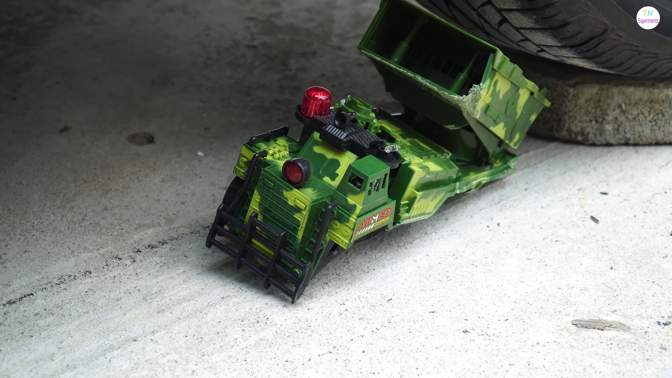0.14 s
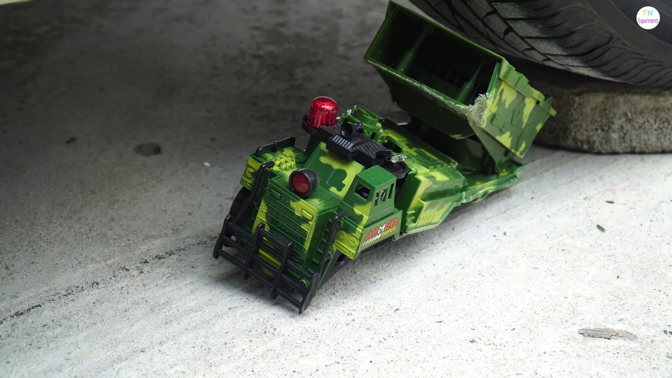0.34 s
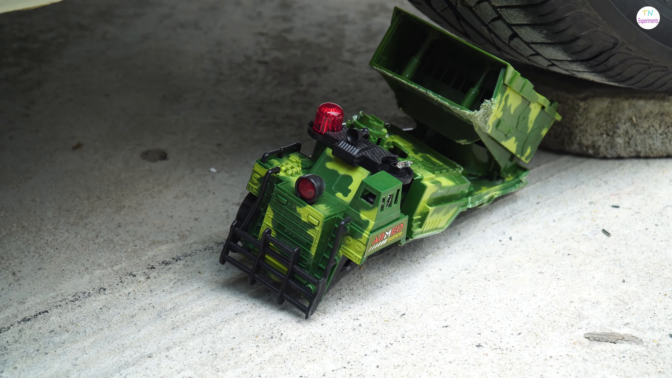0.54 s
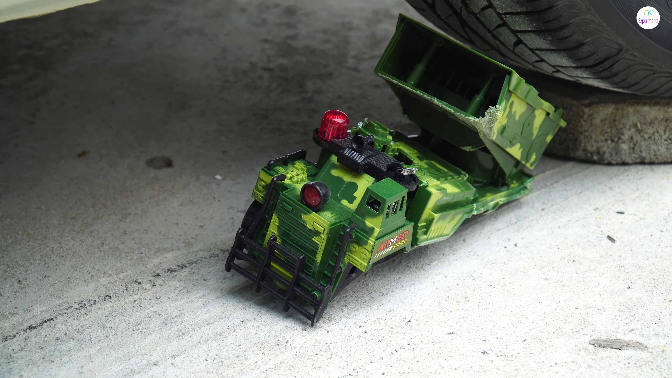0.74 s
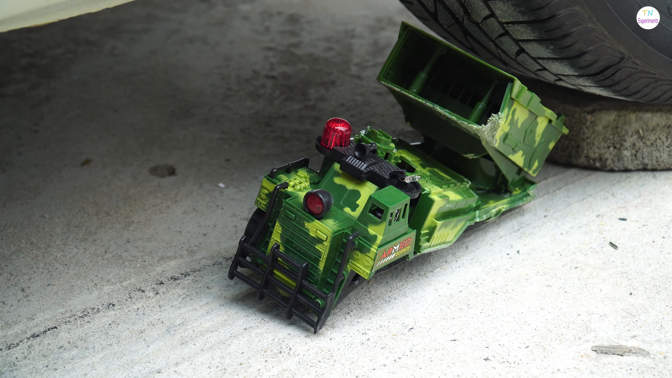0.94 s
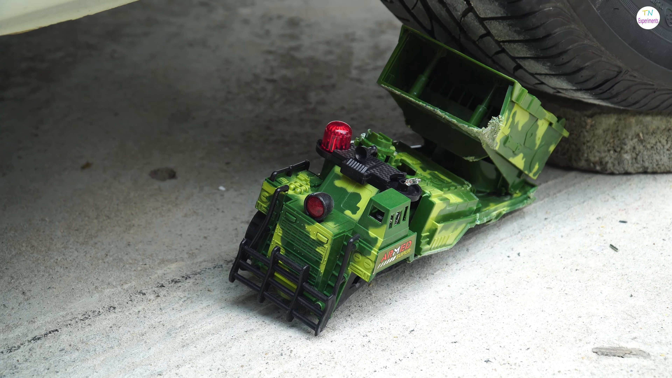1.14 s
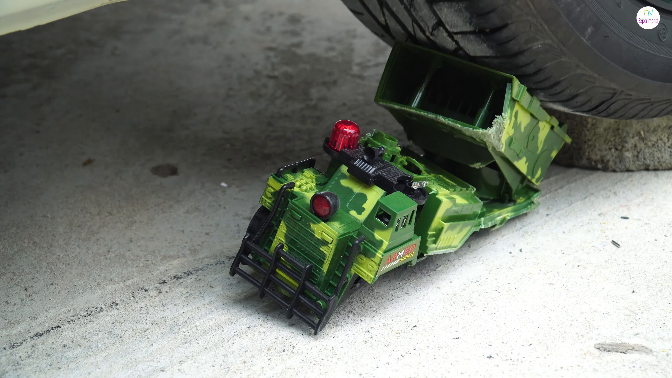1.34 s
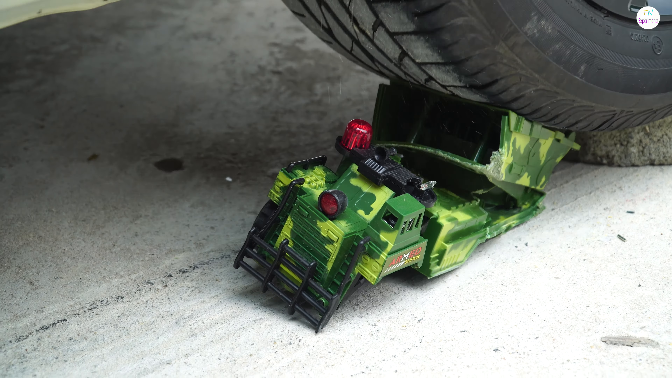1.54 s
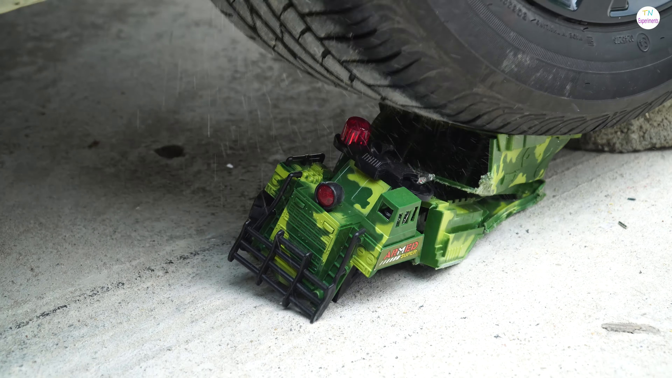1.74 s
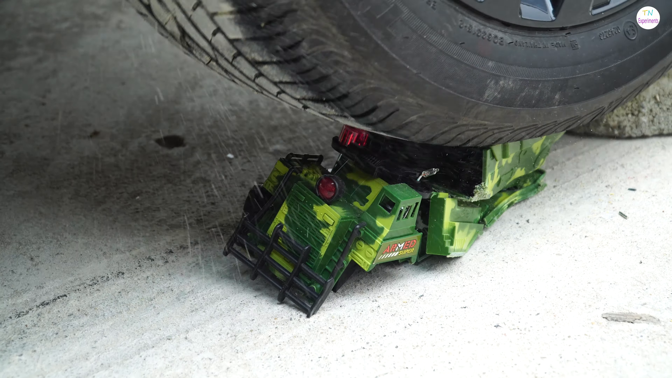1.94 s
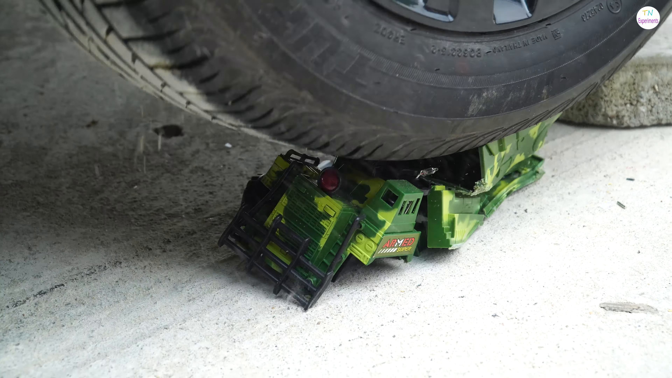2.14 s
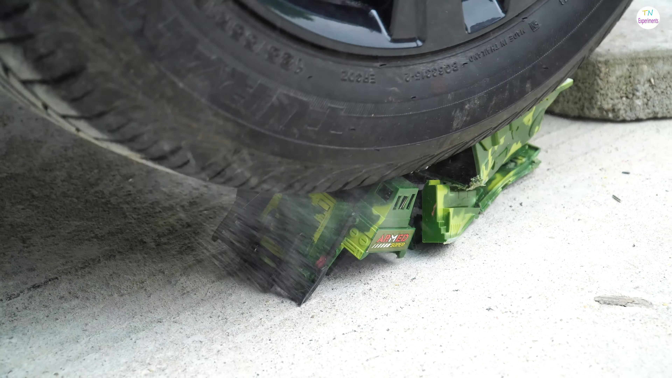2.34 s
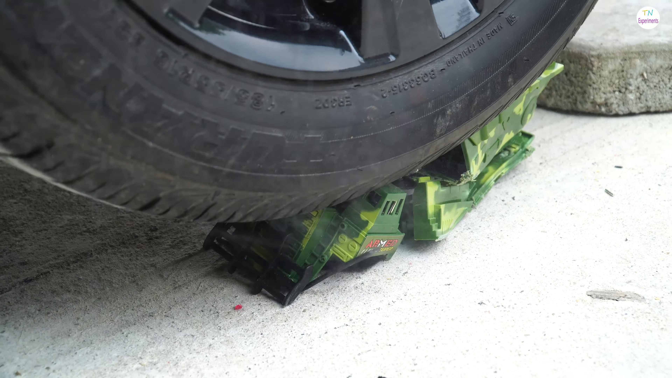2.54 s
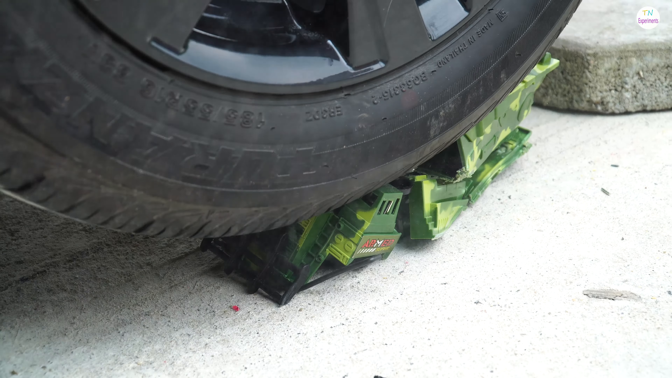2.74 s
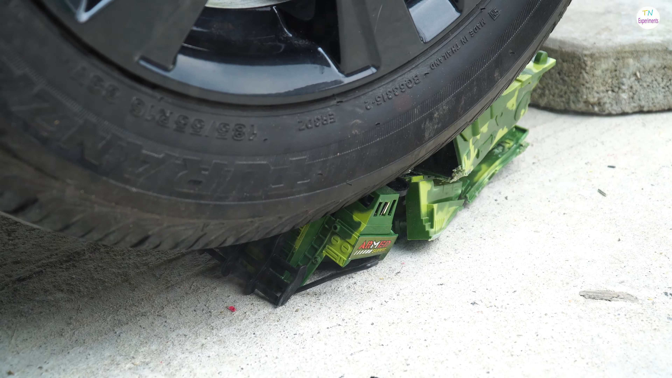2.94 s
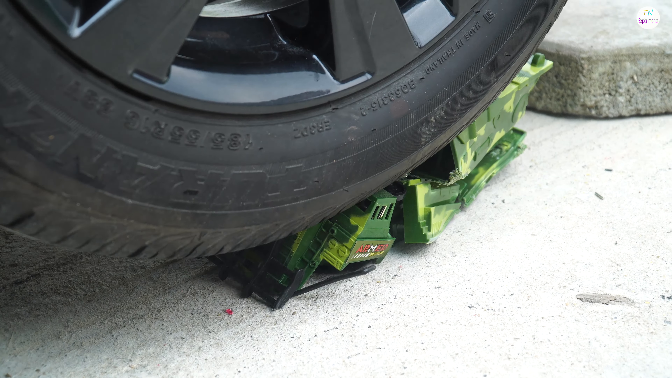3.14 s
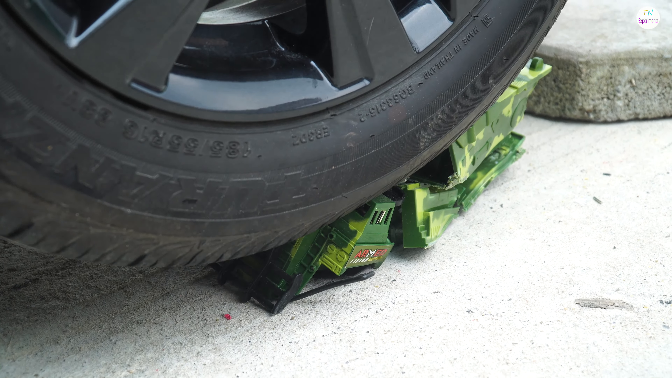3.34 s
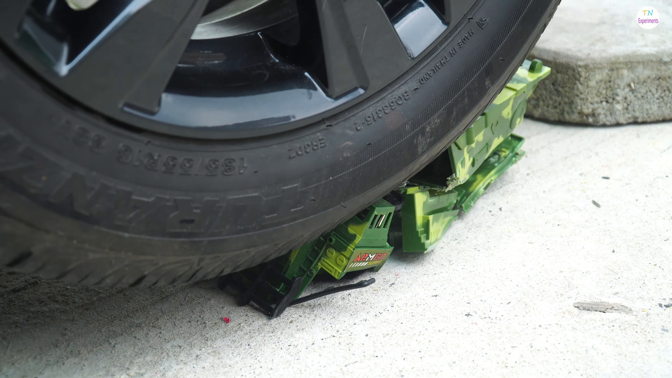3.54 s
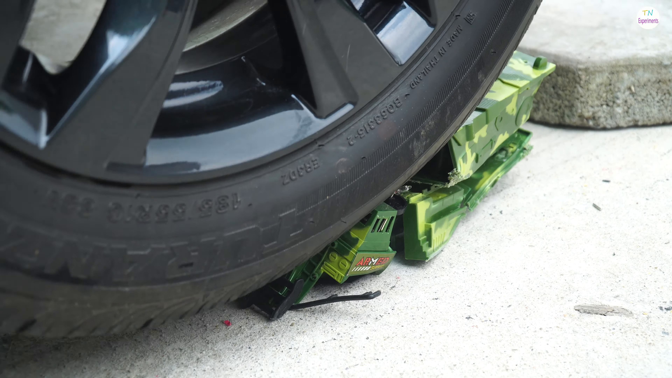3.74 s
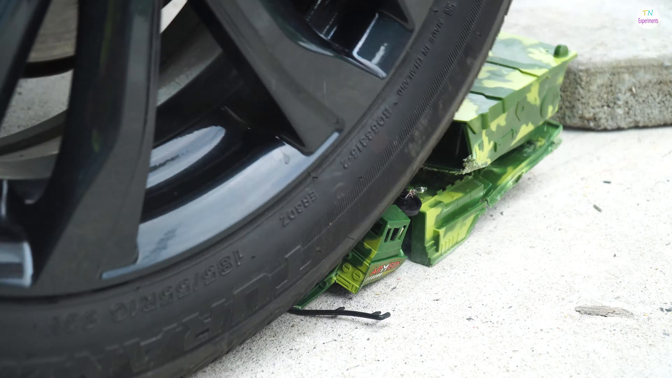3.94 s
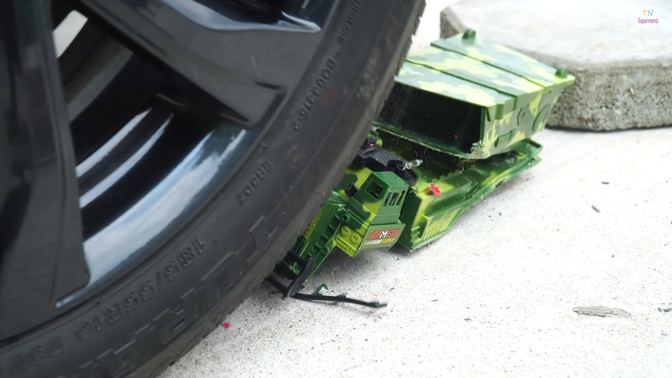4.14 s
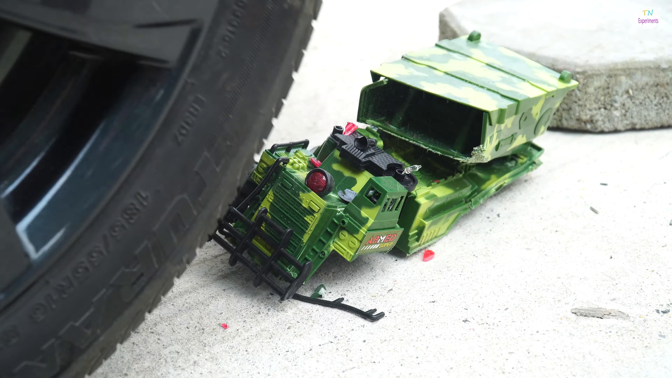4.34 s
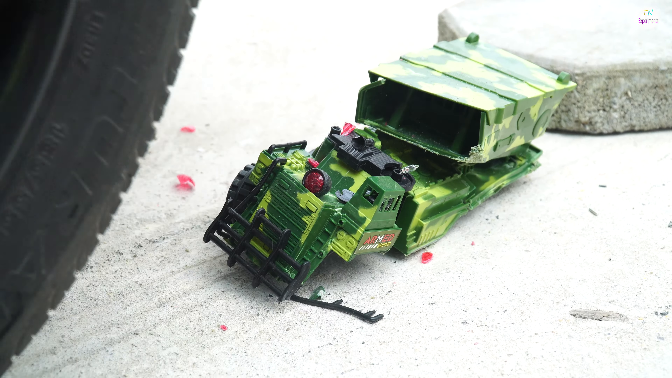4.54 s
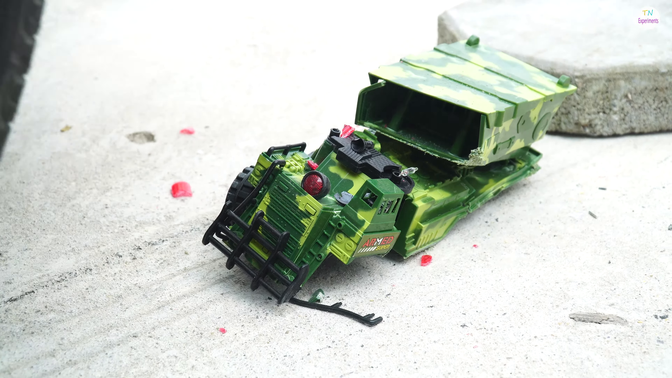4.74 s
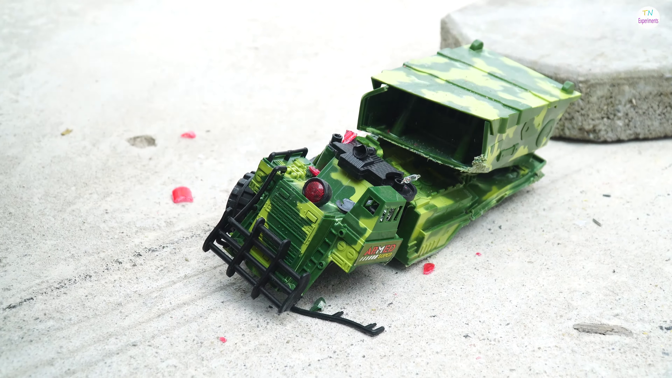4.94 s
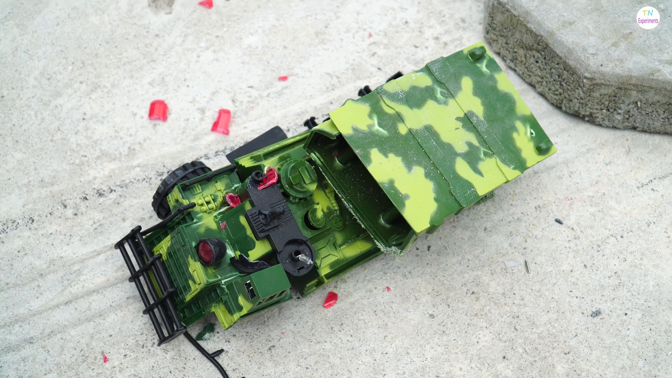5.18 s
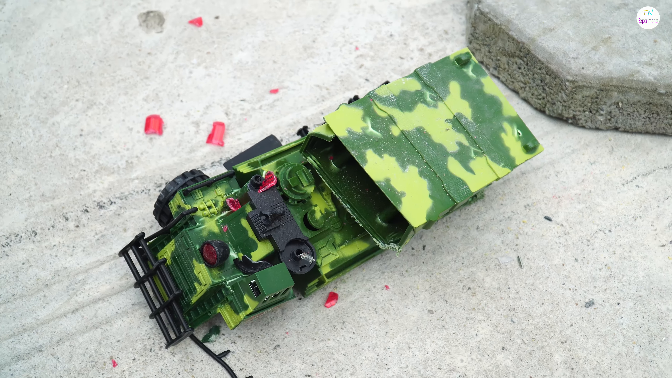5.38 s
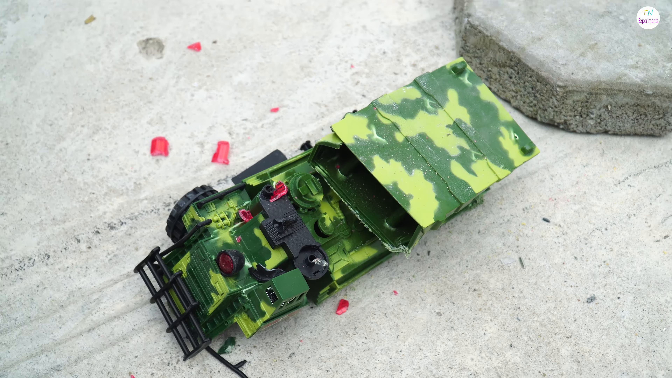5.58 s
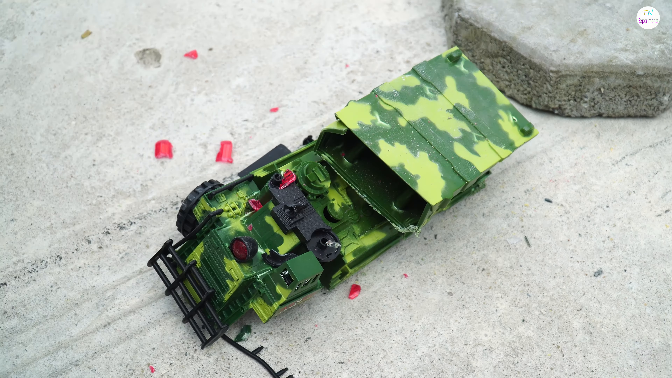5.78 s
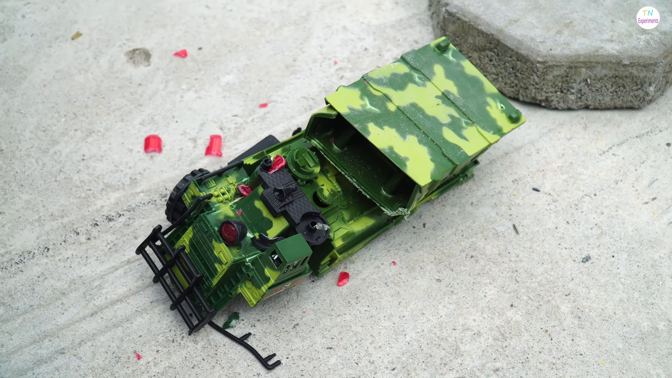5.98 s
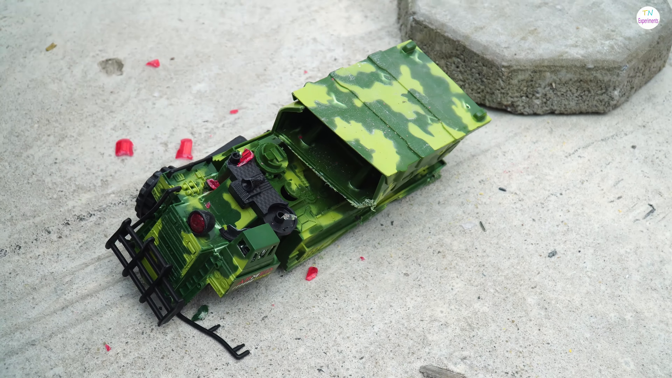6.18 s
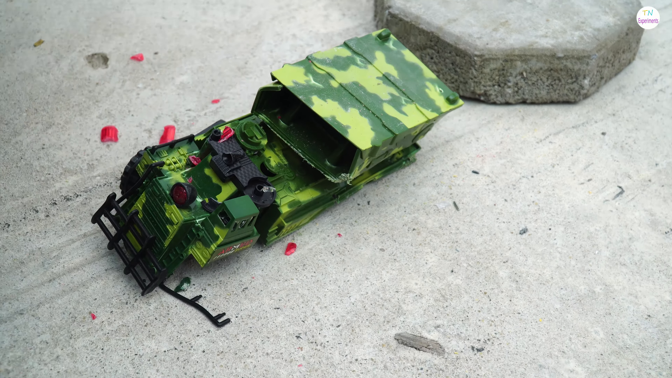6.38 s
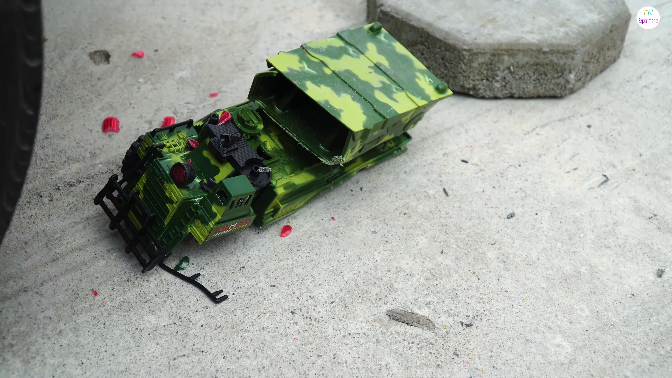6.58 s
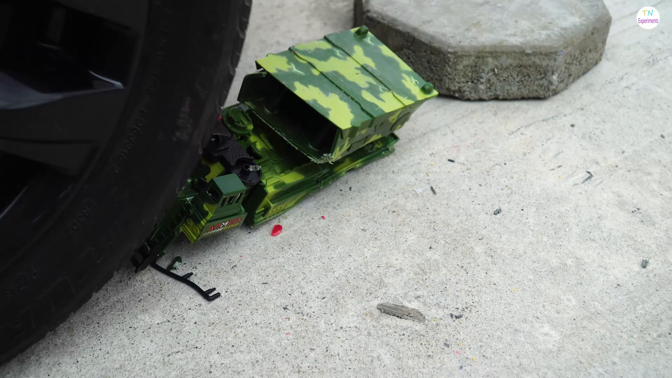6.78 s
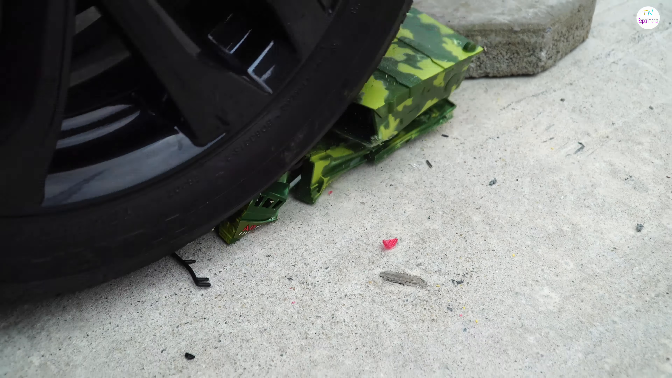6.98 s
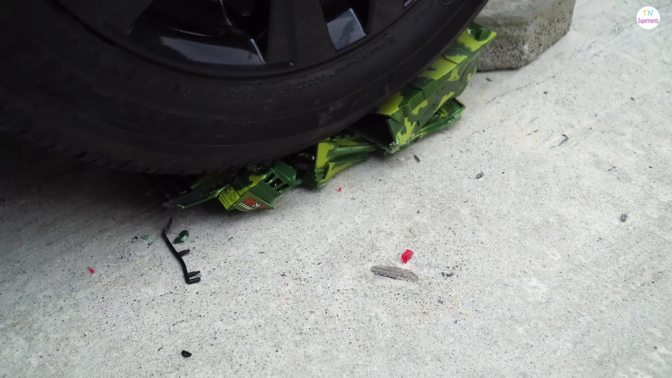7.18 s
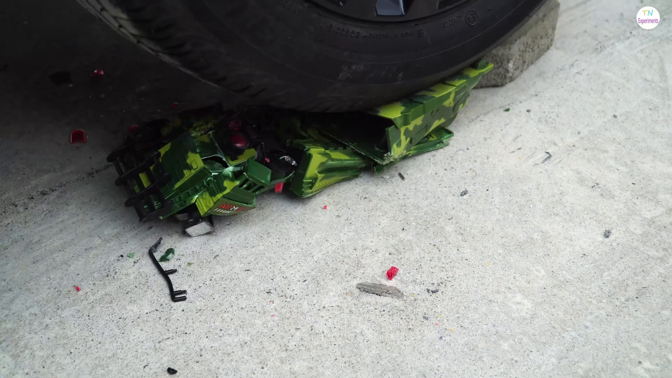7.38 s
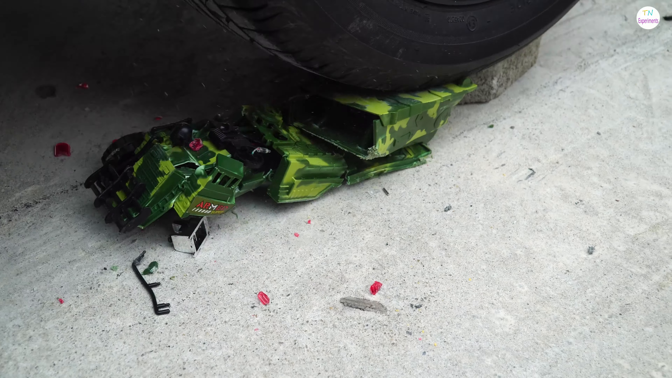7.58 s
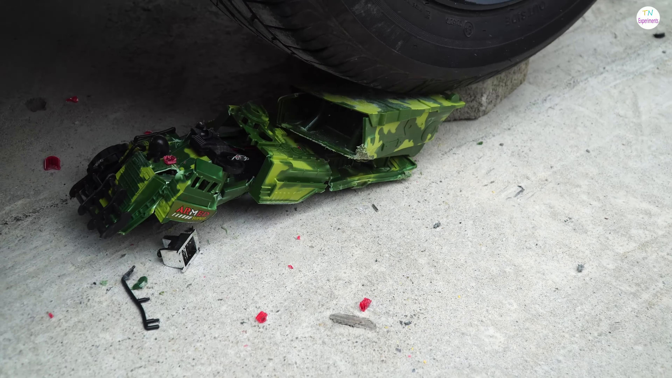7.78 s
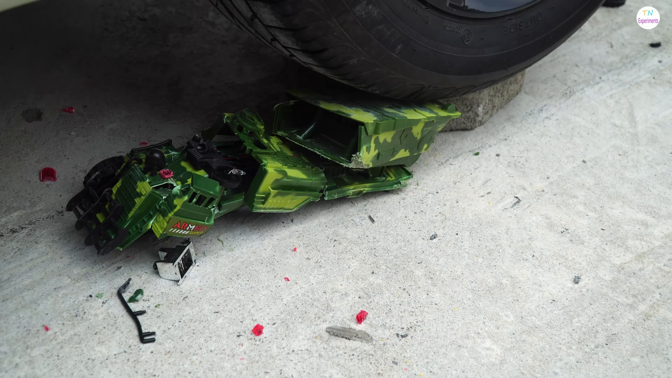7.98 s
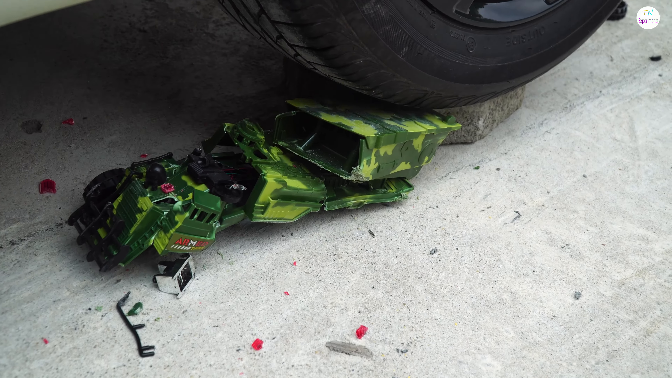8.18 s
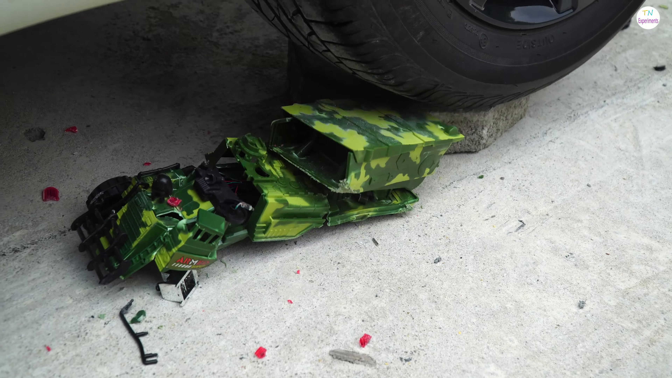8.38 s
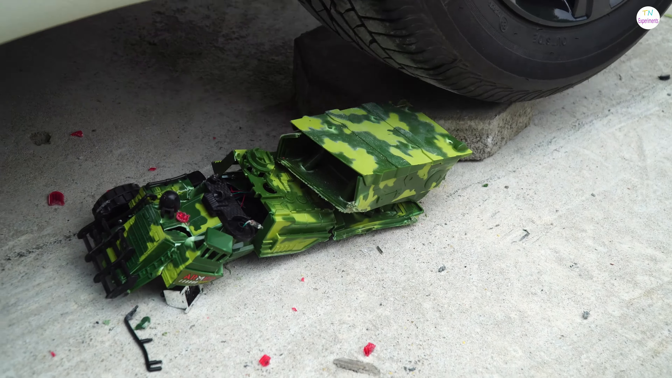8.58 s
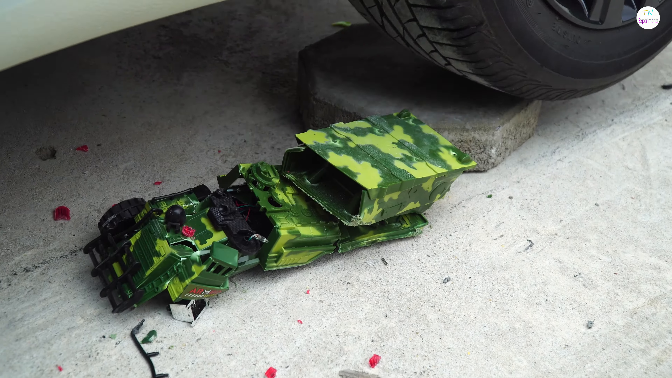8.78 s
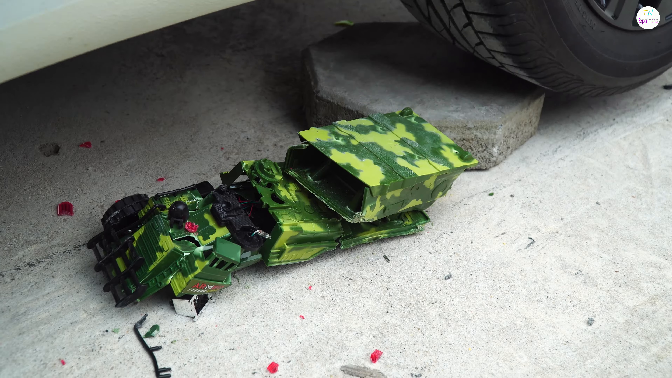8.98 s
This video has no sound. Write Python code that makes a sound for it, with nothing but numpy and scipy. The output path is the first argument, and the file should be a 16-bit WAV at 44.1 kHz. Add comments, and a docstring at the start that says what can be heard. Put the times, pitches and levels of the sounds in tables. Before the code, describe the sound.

Close, dry crunching of a hollow plastic toy under a rolling tyre: three bursts of sharp snaps, small bouncing fragments, and faint outdoor hiss.

```python
"""A slowly rolling car tyre crushes a hollow plastic toy on concrete, heard close by in stereo.
Over outdoor rumble and hiss (filtered noise on level curves), seams snap from about 1 s to 3 s: noise
impulses ring the shell and a loose piece amid crackle, with a low tone at 2.3 s. A dull scrape leads to more
snaps near 4 s; a splinter bounces as ringing taps. Scuffs and thin clicks of shaped noise follow near 6 s,
then a last dense burst near 7 s with another low tone, and a few weak snaps after 8 s."""
import sys
import numpy as np
from scipy import signal
from scipy.fft import rfft, irfft
from scipy.io import wavfile
from scipy.ndimage import uniform_filter1d

SR = 44100
rng = np.random.default_rng(int(sys.argv[2]) if len(sys.argv) > 2 else 0)


def volts_from_decibels(level):
    """Turn decibel levels (scalar or array-like) into linear amplitude factors."""
    exponent = np.asarray(level, float) / 20
    return 10 ** exponent


def dump(signal):
    """Clip the signal to [-1, 1] and save it as 16-bit WAV at the path in sys.argv[1]."""
    limited = np.clip(np.atleast_2d(signal).T, -1, 1)
    pcm = np.round(limited * 32767).astype(np.int16)
    wavfile.write(sys.argv[1], SR, pcm)


N = 397777  # length in samples

# Level curves of the background before the stereo lean: [t/s, rumble level/dB, hiss level/dB]
AIR_LEVELS = [(0, -42.5, -38.5), (1.35, -43, -38), (1.45, -50, -36), (2.6, -59.5, -54), (2.75, -68, -52),
              (3.6, -55, -49.5), (3.8, -57.5, -41.5), (4.3, -66, -50), (5.11, -63.5, -48.5),
              (5.13, -46, -46), (6.65, -45, -41), (6.9, -32, -30), (6.95, -37.5, -23), (7.03, -44.5, -25),
              (7.75, -69.5, -53.5), (9.02, -58.5, -49)]
# Spectrum of the rumble: [f/Hz, relative density level/dB]
RUMBLE_SPECTRUM = [(22, -44), (45, -7), (120, -1), (290, 3.5), (520, -0.5), (1500, -3.5), (4000, -23)]
# Spectrum of the hiss: [f/Hz, relative density level/dB]
HISS_SPECTRUM = [(300, -20.5), (600, -3.5), (1300, 1), (2300, -1), (5000, -5.5), (13500, -7.5), (16000, -3)]
# Narrow steady bands in the hiss: [f/Hz, width/Hz, relative level/dB]
HISS_BANDS = [(311, 19, 0), (660, 41, 3.5), (1105, 24, 7.5), (1640, 480, -0.5), (2144, 64, 1.5)]
# Stereo likeness of diffuse noise: [f/Hz, left-right correlation]
LIKENESS = [(60, 1), (380, 0.78), (2380, 0.013), (15000, 0.068)]
# Low tones that glide down and linger: [start t/s, end t/s, settled f/Hz, level before fading/dB]
LOW_TONES = [(2.349, 2.76, 235, -47.5), (7.414, 7.724, 236.4, -50)]
# Dull scrape as the tyre drags on: [t/s, level/dB]
DRAG_LEVEL = [(3.18, -63), (3.25, -39.5), (3.35, -37), (3.5, -42.5), (3.64, -78)]
# Spectrum of the scrape: [f/Hz, relative density level/dB]
DRAG_SPECTRUM = [(35, -50), (60, -30), (186, 2), (641, -5.5), (1400, -7.5), (5000, -18), (9000, -48)]
# Grains of grit popping under the rubber: [t/s, peak level/dB, centre f/Hz]
GRIT_POPS = [(6.303, -16, 12500), (6.401, -12, 13700), (6.428, -18, 12000), (6.639, -22, 12500)]
# Short slides of the toy: [start t/s, length/s, level/dB, body f/Hz]
SLIDES = [(5.784, 0.091, -32, 745), (6.068, 0.046, -36.5, 3070), (6.616, 0.036, -27, 2120)]
# Landings of a hard splinter: [t/s, peak level/dB, extra level of its lowest mode/dB]
LANDINGS = [(4.347, -34, -15), (4.425, -35, -16), (4.478, -29.5, 7), (4.538, -34, -25)]
# Modes of the splinter: [f/Hz, width/Hz, relative level/dB]
SPLINTER_MODES = [(3310, 38, 3), (7000, 36, -4), (9560, 41, -1), (12500, 51, -2)]
# Modes of the hollow shell: [f/Hz, width/Hz, relative level/dB]
SHELL_MODES = [(313, 22, 2), (632, 130, 1.5), (1080, 170, 1), (1410, 160, 5.5), (1950, 370, -0.5),
               (2470, 270, 0)]
# Spectrum of breaking plastic: [f/Hz, relative density level/dB]
CRACK_SPECTRUM = [(300, -24), (650, -10), (1400, -5.5), (2500, -3.5), (3300, -3), (16000, -4)]
# Pressure of the tread, one list a burst: [t/s, relative crackle level/dB]
TREAD_PRESSURE = [
    [(1.28, -58), (1.35, -31.5), (1.5, -37), (1.9, -30.5), (1.95, -55)],
    [(1.96, -67), (2.25, -28), (2.315, -47.5), (2.34, -24.5), (2.445, -46.5), (2.7, -64)],
    [(3.6, -59), (3.69, -34.5), (3.73, -46), (4.0, -34.5), (4.17, -32.5), (4.25, -42.5), (4.55, -61)],
    [(6.55, -44.5), (6.9, -47), (6.93, -26), (7.19, -29), (7.215, -46), (7.24, -24), (7.37, -29),
     (7.46, -41.5), (7.7, -42.5), (7.85, -54)],
]
# Snapping seams: [t/s, level (6 dB above the loudest 2 ms rms)/dB, ring of the loosened piece f/Hz,
# brightness 0-1, tearing tail relative to the first crack/dB]
SEAM_SNAPS = [(0.984, -13.5, 730, 0, 10), (0.985, -12, 1140, 0.43, 14), (1.382, -4, 1320, 1, -13),
              (1.398, -5, 1700, 0.97, -5), (1.424, -4.5, 2700, 0.97, -11), (1.448, -13, 2100, .75, 6),
              (1.467, -4.5, 1510, 0.9, 4), (1.528, -14.5, 1180, 0.3, 9), (1.544, -5.5, 2120, 0.81, -6),
              (1.574, -2.5, 2260, 0.68, -14.5), (1.622, -11, 2510, 0.2, -14), (1.656, -7, 2250, 0.5, -1),
              (1.689, -3.5, 1820, 0.9, -12), (1.703, -11, 1040, 0.7, -3), (1.732, -6.5, 2000, 0.94, -25),
              (1.737, -6, 5200, 1, -6), (1.773, -5, 4100, 0.92, -8.5), (1.82, -4.5, 2400, 0.7, -31),
              (1.846, -2, 2160, 1, -15), (1.864, -6.5, 2220, 0.94, 5), (1.902, -7, 2560, 1, -9.5),
              (1.964, -20, 600, 0.1, 3), (1.969, -7.5, 745, 0.3, -5), (1.973, -15.5, 2990, 0.2, 4),
              (2.006, -8, 1297, 0.83, 5), (2.028, -2.5, 2000, 0.96, -10), (2.04, -9.5, 2500, 0.98, -14),
              (2.122, -9, 2490, 0.99, -12), (2.139, -7, 1420, 0.98, 4), (2.17, -7.5, 2030, 0.95, 2),
              (2.202, -8, 1450, 0.66, -8), (2.231, -6, 2200, 1, -13), (2.264, -9, 9000, 1, -3),
              (2.326, -0.5, 8400, 0.95, -27), (2.34, -13, 2220, 1, 9), (2.454, -13.5, 8650, 1, -6.5),
              (2.501, -7.5, 1350, 0.76, -3), (2.53, -3.5, 1420, 1, -16), (2.542, -5.5, 1370, 0.99, -6),
              (2.586, -9, 1370, 0.96, -5), (2.61, -13.5, 1420, 0.93, -13.5), (2.652, -8.5, 1390, 0.9, -4),
              (2.769, -27.5, 6840, 0.93, -11), (2.826, -35, 1080, 0.35, -11), (2.93, -31, 2200, 0.4, -21),
              (3.072, -8.5, 2180, 0.98, -5), (3.142, -18, 11400, 1, -6), (3.67, -16.5, 2190, 0.87, 9),
              (3.742, -16.5, 2220, 0.6, -12), (3.771, -8.5, 2230, 0.8, 0), (3.787, -10, 1410, 0.77, -10),
              (3.821, -12, 2350, 0.64, -22), (3.869, -5, 1690, 0.98, -11), (3.923, -11, 2120, 0.76, -11),
              (3.942, -4.5, 1080, 1, -11), (3.945, -8, 2120, 0.85, -5), (3.978, -16, 2380, 0.7, -25),
              (3.984, -5.5, 2570, 1, -19), (3.993, -6, 2260, 0.85, -6), (4.012, -11.5, 2700, .8, -8),
              (4.019, -6, 2590, 0.83, -15), (4.049, -8, 2510, 0.46, -20), (4.059, -25, 2540, 0.2, 8),
              (4.1, -4.5, 1250, 0.92, -8.5), (4.1, -10, 2600, 0.6, -12), (4.259, -19.5, 3300, 0.33, -11),
              (4.333, -26.5, 2730, 0.76, 7), (4.379, -24.5, 2410, 0.99, 2), (4.48, -21.5, 3300, 1, -23),
              (6.68, -14, 5140, 0.96, -33), (6.926, -7.5, 2400, 0.83, 9), (6.943, -5.5, 1600, 0.74, -7),
              (6.984, -8.5, 1630, 0.98, 0), (6.999, -9.5, 1640, 0.86, 11), (7.022, -4, 7000, 0.86, -11),
              (7.034, -10, 2430, 0.98, 4), (7.057, -8, 1400, 0.97, -4), (7.069, -2.5, 1460, 0.92, -5),
              (7.099, -1.5, 6700, 0.94, -11), (7.127, -5, 1580, 0.96, -8), (7.163, -4.5, 2440, 0.3, -14),
              (7.179, -5.5, 1600, .67, -19), (7.192, -4, 2520, 1, -11), (7.227, -11, 1950, 0.93, -4),
              (7.239, -8, 2450, 0.5, -18), (7.247, -10, 2300, 0.8, -14), (7.257, -8.5, 2450, 1, -9),
              (7.265, -5.5, 1700, 0.6, -15), (7.274, -8, 4100, 0.6, -15), (7.303, -11.5, 2000, 0.94, 6),
              (7.315, -5.5, 2100, 0.96, -16), (7.332, -10, 3020, 0.98, -21), (7.344, -6.5, 420, 1, -3),
              (7.364, -10.5, 269, 0.8, -5), (7.404, -3.5, 1640, 0.97, -5), (7.518, -10.5, 12500, 1, -13),
              (7.565, -13.5, 2350, 0.54, -21), (7.624, -8.5, 2160, 0.99, 1), (7.633, -18, 1480, 0.3, -7),
              (7.729, -5, 870, 1, -14), (7.91, -36.5, 1640, 0.3, -1), (8.11, -32, 1510, 0.98, -10),
              (8.146, -31.5, 1260, 0.4, -10), (8.306, -26, 12900, 0.94, 4), (8.407, -16.5, 1230, 0.97, 2.5),
              (8.418, -19, 1680, 0.85, 1), (8.448, -25, 3500, 0.95, 5)]


def evened(x):
    """Normalization: scales a signal to rms 1."""
    return x / np.sqrt(np.mean(x ** 2) + 1e-20)


def read(points, hz):
    """Interpolation of a spectrum on a logarithmic frequency axis."""
    f, value = np.transpose(points)
    return np.interp(np.log(hz + 1), np.log(f + 1), value)


def along(rows, column):
    """Linear interpolation of a level curve at every sample; -120 dB outside it."""
    rows = np.array(rows)
    return np.interp(np.arange(N) / SR, rows[:, 0], rows[:, column], -120, -120)


def add(mix, s, sound):
    """Superposition: adds a sound to the mix at time s."""
    part = mix[:, round(s * SR):][:, :sound.shape[1]]
    part += sound[:, :part.shape[1]]


def coloured(x, points):
    """Linear filtering: weights x with a spectrum, then sets rms 1."""
    size = x.shape[-1]
    gain = volts_from_decibels(read(points, np.fft.rfftfreq(size, 1 / SR)))
    return evened(irfft(rfft(x) * gain, size))


def pair(size, same):
    """Partial correlation: two noises alike in the bass and partly alike in the treble."""
    common, other = rng.standard_normal((2, size))
    treble = signal.lfilter(*signal.butter(2, 1500, "high", fs=SR), other)
    apart = np.clip(1 - same, 0, 1) * treble
    return np.array([common + apart, common - apart])


def ringing(x, modes):
    """Modal resonance: a sum of two-pole resonators, each f/Hz, width/Hz, level/dB."""
    out = np.zeros_like(x)
    for hz, width_hz, db in modes:
        r = np.exp(-np.pi * width_hz / SR)
        poles = [1, -2 * r * np.cos(2 * np.pi * hz / SR), r * r]
        out += volts_from_decibels(db) * signal.lfilter([1 - r, 0, r - 1], poles, x)
    return out


def diffuse(points, patchy_db):
    """Diffuse field: stereo noise alike in the bass, less so in the treble, with drifting patches."""
    frames, hz = N // 256 + 5, np.fft.rfftfreq(1024, 1 / SR)
    a, b, c, d, patches = rng.standard_normal((frames, 513, 5)).T
    patches = uniform_filter1d(patches, size=10, axis=0)
    patches = evened(uniform_filter1d(patches, size=14, axis=1))
    same = np.clip(read(LIKENESS, hz), -1, 1)[:, None]
    left = a + 1j * b
    right = same * left + np.sqrt(1 - same ** 2) * (c + 1j * d)
    z = np.array([left, right])
    z *= volts_from_decibels(read(points, hz)[:, None] + patchy_db * patches)
    return evened(signal.istft(z, nperseg=1024, noverlap=768)[1][:, :N])


def air():
    """Broadband ambient noise: distant rumble and a fine hiss with narrow resonant bands."""
    left_lag_s = 7e-5  # distant sound reaches the left channel a little later
    bands = evened(ringing(pair(N, 0.068), HISS_BANDS))
    hiss = volts_from_decibels(along(AIR_LEVELS, 2)) * (diffuse(HISS_SPECTRUM, 1.0) + volts_from_decibels(-6.0) * bands)
    rumble = volts_from_decibels(along(AIR_LEVELS, 1)) * diffuse(RUMBLE_SPECTRUM, 1.0)
    left, right = rumble + hiss
    return np.array([np.roll(left, round(left_lag_s * SR)), right])


def hum(start, end, hz, db):
    """Frequency and amplitude modulation: a soft low tone sags to its pitch, wavers and fades."""
    glide, glide_s = .2, 0.02  # relative excess pitch at the start and its time constant
    rise_s, fade_db_per_s = 0.0091, 59
    t = np.arange(0, end - start, 1 / SR)
    waver = evened(uniform_filter1d(rng.standard_normal(len(t)), size=700))
    fade = signal.windows.tukey(len(t), .1) * (1 - np.exp(-t / rise_s))
    fade *= volts_from_decibels(db - fade_db_per_s * t + 2.9 * waver)
    turns = np.cumsum(hz * (1 + glide * np.exp(-t / glide_s))) / SR
    return np.tile(fade * np.sin(2 * np.pi * turns + waver / 2), (2, 1))


def drag():
    """Friction: rubber and plastic rub dully on the floor, shake the shell and whistle in a thin band."""
    rub = diffuse(DRAG_SPECTRUM, 1.5)
    shell = evened(ringing(ringing(rub, SHELL_MODES), SHELL_MODES))
    whistle = ringing(rub, [(4090, 60, 6.6)])
    return volts_from_decibels(along(DRAG_LEVEL, 1)) * evened(rub + volts_from_decibels(-9) * shell + whistle)


def tick(db, hz):
    """Impulse excitation: a grain of grit pops under the rubber as a thin high click."""
    t60_s, width_hz = 0.004, 5800
    pop = pair(512, 0.45) * volts_from_decibels(-60 * np.arange(512) / (t60_s * SR))
    for _ in range(2):
        pop = ringing(pop, [(hz, width_hz, 0)])
    return volts_from_decibels(db) * pop / abs(pop.mean(0)).max()


def scuff(length, db, body_hz):
    """Friction-driven resonance: the toy slides with a gritty rub and a hollow body."""
    grit_db, body_db = 2.5, -1.5
    size = round(length * SR)
    grit = volts_from_decibels(grit_db * evened(uniform_filter1d(rng.standard_normal(size), size=120)))
    rub = coloured(pair(size, 0.23), CRACK_SPECTRUM) * grit
    body = evened(ringing(rub, [(body_hz, 0.36 * body_hz, 0)]))
    return volts_from_decibels(db) * evened(rub + volts_from_decibels(body_db) * body) * signal.windows.tukey(size, .35)


def bounce(db, low_db):
    """Impact excitation: a tiny tap rings the splinter; a flat landing favours its lowest mode."""
    tap_t60_s = 0.0014
    tap = pair(4096, 0.99) * volts_from_decibels(-60 * np.arange(4096) / (tap_t60_s * SR))
    ring = volts_from_decibels(low_db) * ringing(tap, SPLINTER_MODES[:1]) + ringing(tap, SPLINTER_MODES[1:])
    return volts_from_decibels(db) * ring / abs(ring).max()


def pressure():
    """Superposition of load curves: the crackle amplitude under the tread."""
    return sum(volts_from_decibels(along(rows, 1)) for rows in TREAD_PRESSURE)


def crackle(per_s=700, spread_db=7):
    """Random impulse process: tiny cracks of random size puff under the tread and shake the shell."""
    puff_s = 0.0046  # decay time constant
    happens = rng.random(N) < per_s / SR
    size = volts_from_decibels(spread_db * np.minimum(rng.exponential(1, N), 3)) * happens
    puffs = signal.lfilter([1], [1, -np.exp(-1 / (puff_s * SR))], size) * pair(N, 0.58)
    fizz = coloured(puffs, CRACK_SPECTRUM)
    shell = evened(ringing(fizz, SHELL_MODES))
    return pressure() * (fizz + 0.57 * shell)


def bent_shell():
    """Modal perturbation: each snap bends the shell, moving the pitch and level of its modes."""
    shift, spread_db = 0.062, 2.5  # standard deviations; the shift is relative
    draws = rng.standard_normal((len(SHELL_MODES), 2))
    return [(hz * (1 + shift * a), width_hz, db + spread_db * b)
            for (hz, width_hz, db), (a, b) in zip(SHELL_MODES, draws)]


def loose_piece(drive, piece_hz):
    """Modal resonance: a loosened piece rings at its own pitch and at inharmonic overtones."""
    ratios, overtone_db, relative_width = np.array((1.8, 2.37, 3.47)), -9.5, 0.068
    width_hz = min(20 * (piece_hz / 1000) ** 3 + 70, piece_hz / 7)  # small pieces ring high and briefly
    ring = ringing(drive, [(piece_hz, width_hz, 0)])
    tones = np.minimum(piece_hz * ratios * rng.uniform(0.9, 1.147, len(ratios)), SR / 3)
    overtones = ringing(drive, [(hz, relative_width * hz, 0) for hz in tones])
    return evened(ring) + volts_from_decibels(overtone_db) * evened(overtones)


def snap(peak_db, piece_hz, bright, tail_db):
    """Brittle fracture: a short crack with a rough tail excites the shell and one loosened piece."""
    crack_s, tear_t60_s = .0011, 0.096  # width of the breaking instant; decay of the tear
    extra_treble_fade_db_per_s = 296  # the hiss of the tear dies before the ringing
    shell_db, pan_spread_db = -2.5, 1  # snaps come from all over the toy
    t = np.arange(5120) / SR
    # the seam tears unevenly
    grit = volts_from_decibels(2.5 * evened(uniform_filter1d(rng.standard_normal(len(t)), size=60)))
    tail = volts_from_decibels(tail_db - 60 * t / tear_t60_s) * grit * (1 - np.exp(-t / 0.00023))
    noise = coloured(pair(len(t), 0.67), CRACK_SPECTRUM)
    # the crack's noise is kept above the bass, below the piece's pitch
    noise = signal.lfilter(*signal.butter(3, min(piece_hz / 3, 450), "high", fs=SR), noise)
    crack = np.exp(-(t / crack_s) ** 2 / 2)
    drive = noise * (crack + tail)
    direct = noise * (crack + tail * volts_from_decibels(-extra_treble_fade_db_per_s * t))
    shell = signal.lfilter(*signal.butter(2, 4200, fs=SR), ringing(drive, bent_shell()))
    piece = loose_piece(drive, piece_hz)
    bright = np.clip(bright, 0, .995)
    dull = np.sqrt(1 - bright ** 2)
    body = dull * volts_from_decibels(shell_db) * evened(shell) + (0.19 + 0.73 * dull) * evened(piece)
    fade_out = signal.windows.tukey(2 * len(t), .3)[len(t):]
    sound = (body + bright * evened(direct)) * fade_out
    sound = sound * volts_from_decibels(pan_spread_db * rng.standard_normal() * np.array([[.5], [-.5]]))
    loudest = np.sqrt(uniform_filter1d(sound.mean(0) ** 2, size=88).max())  # over 2 ms
    return volts_from_decibels(peak_db) * sound / (2 * loudest)


def yard(x, t60=0.026):
    """Scattering: sparse decaying echoes from floor, kerb stones and the underside of the car."""
    t = np.arange(6000) / SR
    echoes = rng.standard_normal((2, 6000)) * (rng.random((2, 6000)) < .05)
    tail = echoes * volts_from_decibels(-60 * t / t60) * (t > .002)
    return signal.oaconvolve(x, tail / np.linalg.norm(tail[0]), axes=1)[:, :N]


def leaning(x, lean_db):
    """Interchannel level difference: louder on the left above the bass, by lean_db in the treble."""
    bass = signal.filtfilt(*signal.butter(1, 900, fs=SR), x)
    return bass + volts_from_decibels(lean_db * np.array([[.5], [-.5]])) * (x - bass)


def scene():
    """Superposition of the toy, its scatter and the scrape over the background."""
    toy = crackle()
    for rows, source in ((SEAM_SNAPS, snap), (SLIDES, scuff), (GRIT_POPS, tick), (LANDINGS, bounce)):
        for s, *settings in rows:
            add(toy, s, source(*settings))
    # the toy's sounds stay above the bass
    toy = signal.sosfilt(signal.butter(2, 250, "high", fs=SR, output="sos"), toy)
    for row in LOW_TONES:
        add(toy, row[0], hum(*row))
    near = toy + volts_from_decibels(-7.5) * yard(toy) + drag()
    return leaning(near, 3) + leaning(air(), 8)  # lean in dB


def band_limit(x):
    """A steep low-pass at the top of the band."""
    return signal.sosfilt(signal.butter(12, 16820, fs=SR, output="sos"), x)


def record(dry):
    """Saturation and band limiting: soft limiting of peaks, a rumble filter, then a treble edge."""
    ceiling, edge_hz = .85, 15200  # the ceiling is the limiter's asymptote
    limited = dry / (1 + (dry / ceiling) ** 4) ** .25
    held = signal.lfilter(*signal.butter(3, 34, "high", fs=SR), limited)
    edge = signal.firwin(127, edge_hz, window=("kaiser", 6), fs=SR)
    mix = signal.oaconvolve(held, edge[None], "same")
    return band_limit(mix)


dry = scene()
out = record(dry)
dump(out)
```